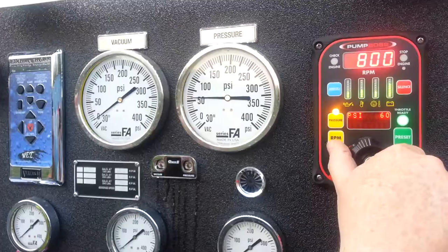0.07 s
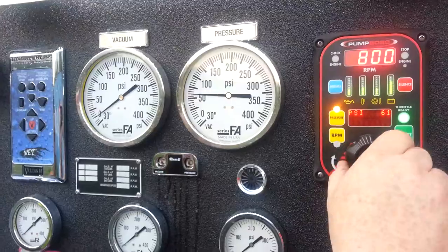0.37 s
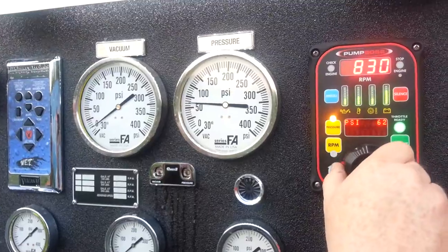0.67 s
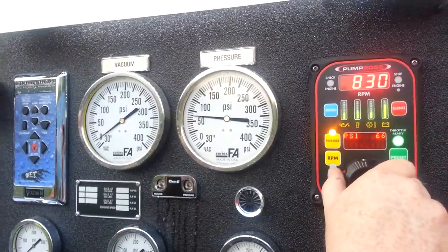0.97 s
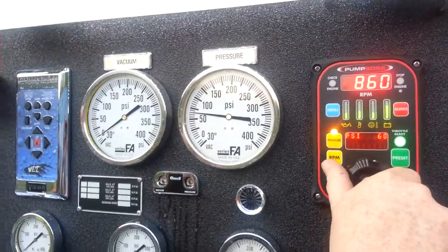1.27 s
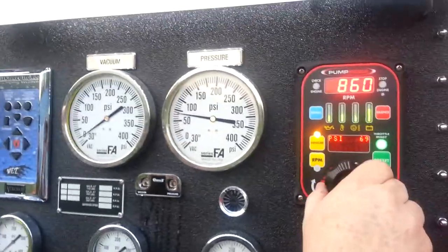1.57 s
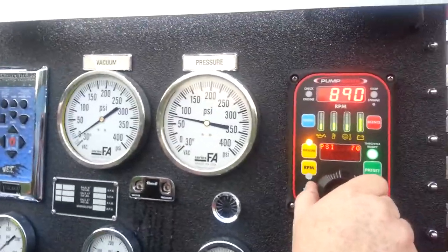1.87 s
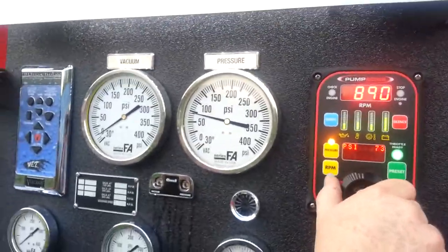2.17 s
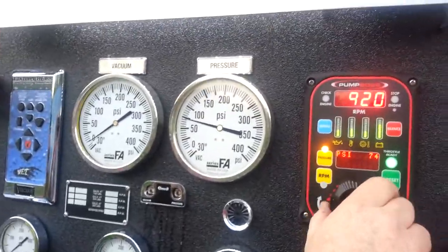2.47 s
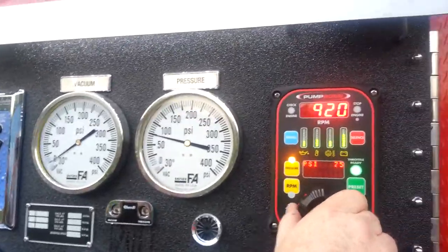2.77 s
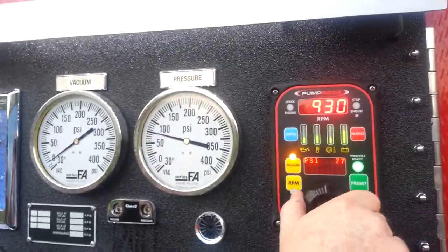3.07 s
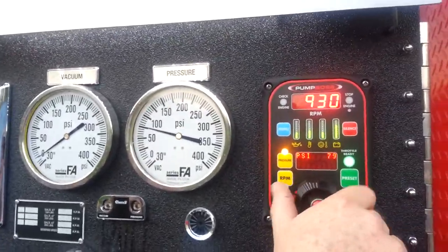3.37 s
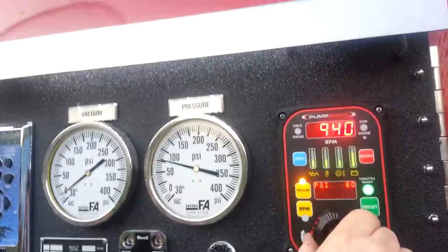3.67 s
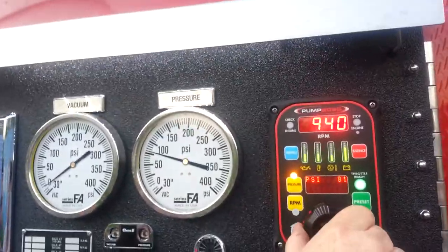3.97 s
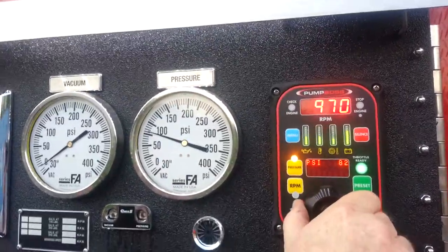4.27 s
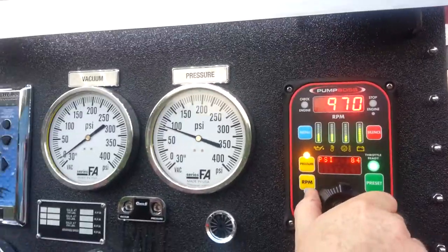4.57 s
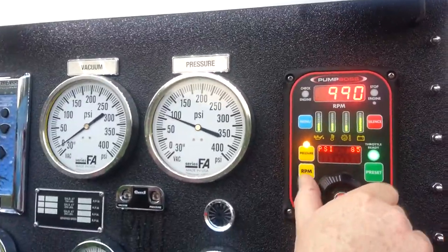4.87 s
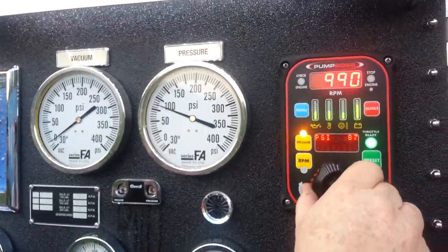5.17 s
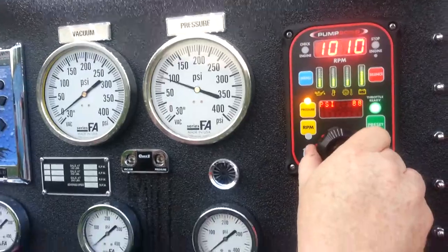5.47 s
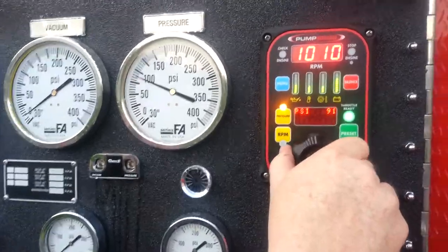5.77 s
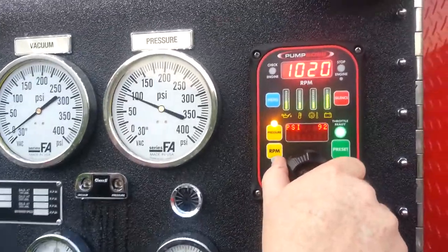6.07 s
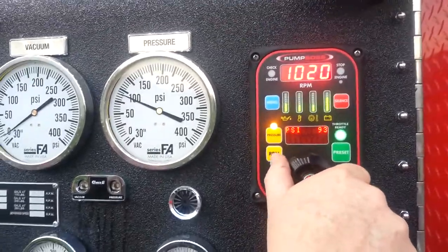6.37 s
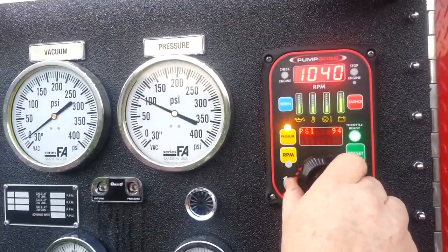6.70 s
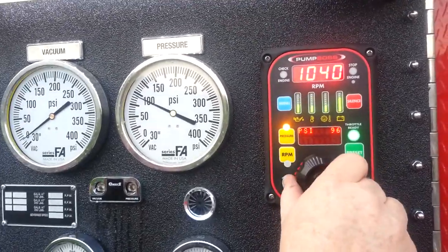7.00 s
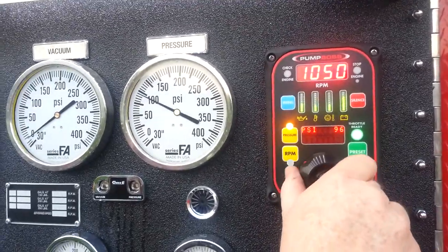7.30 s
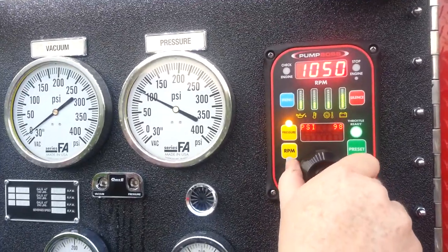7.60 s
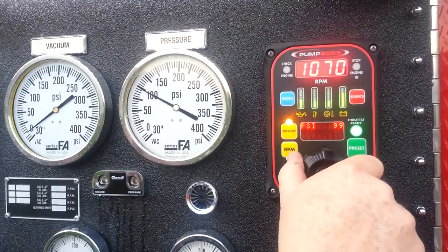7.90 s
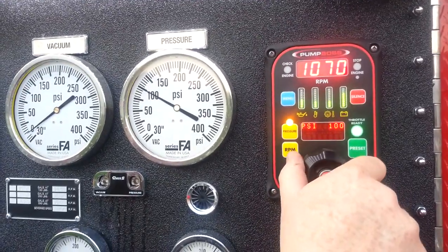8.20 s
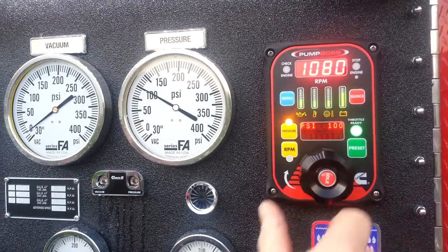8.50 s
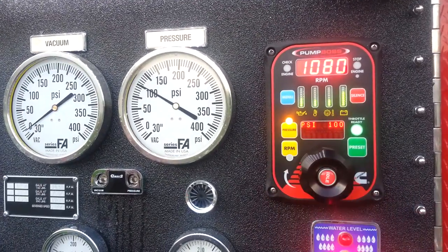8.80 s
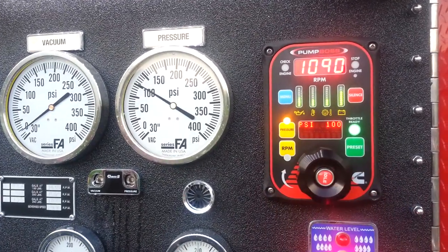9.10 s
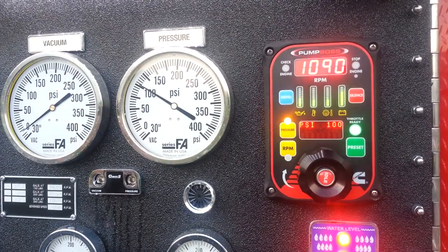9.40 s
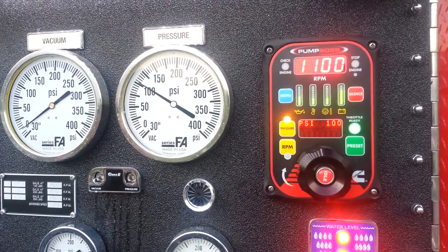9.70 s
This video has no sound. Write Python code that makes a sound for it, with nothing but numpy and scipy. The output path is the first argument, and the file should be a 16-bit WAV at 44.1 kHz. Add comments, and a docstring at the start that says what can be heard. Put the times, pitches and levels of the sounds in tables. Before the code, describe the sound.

A dense diesel roar starts abruptly, heard from right beside a fire truck's pump controls. As a hand turns the throttle knob with a few faint dry ticks, the engine gradually gains speed, carrying a fluttering gear whine and a low pump hum upward with it. Water begins rushing through a valve to the left. The loudness stays nearly even, while the low end grows fuller and a faint high whistle comes and goes.

```python
"""At a fire truck's pump panel: a hand winds the throttle and the six-cylinder diesel climbs from idle.
The engine roars, the pump's drive gears whine, its impeller hums, water rushes in the pipes to the left.
Tones swell and fade as they glide through fixed resonances of the gear casing and pump compartment.
The turbo whistles thinly, loose panels buzz briefly, and the throttle knob rubs and ticks faintly.
The microphone opens abruptly; a limiter catches the highest peaks."""
import sys
import numpy as np
from scipy import signal
from scipy.fft import rfft, irfft, next_fast_len
from scipy.io import wavfile
from scipy.ndimage import uniform_filter1d, minimum_filter1d, map_coordinates

SR = 44100
rng = np.random.default_rng(int(sys.argv[2]) if len(sys.argv) > 2 else 0)


def store_pcm(level_fs):
    """Save levels as 16-bit WAV."""
    pcm = np.round(np.clip(level_fs, -1, 1) * 32767).astype(np.int16)
    wavfile.write(sys.argv[1], SR, np.atleast_2d(pcm).T)


N = 434385
TIME_S = np.arange(N) / SR
VALVE_OPEN_S = 2.69


def engine(shaft_hz, firing_hz, repeat=0.36, throb=0.11, size=4096):
    """Diesel roar: clatter that repeats every two turns, plus fresh noise throbbing with each firing."""
    # f/Hz, relative density/dB
    spectrum = [(40, -44), (80, -21), (125, -11.5), (180, 0), (240, -3.5), (400, 0), (560, -1), (700, 3.5),
                (830, -0.5), (1050, 2.1), (1400, -4), (2000, -5), (3400, -15), (4800, -14.5), (5500, -20),
                (8000, -26.5), (10000, -33.5), (12000, -46), (14000, -90)]
    # f/Hz, left-right coherence
    coherence = [(130, 0.97), (270, 0.94), (450, 0.5), (700, 0.38), (1200, -0.075), (1800, -0.53),
                 (2500, 0.0071)]
    # t/s, level/dB
    levels = [(.85, -15.5), (2.2, -15), (2.9, -14), (3.6, -16), (5, -16), (6.3, -14.5), (7.5, -15.5),
              (9.85, -15)]
    cycle_index = cycles_of(shaft_hz) / 2 % 1 * size
    patterns = rng.standard_normal((2, size))
    clatter = np.array([map_coordinates(p, [cycle_index], mode="grid-wrap") for p in patterns])
    pulsing = 1 + throb * np.cos(2 * np.pi * cycles_of(firing_hz))
    gas = coloured(stereo_noise() * pulsing, spectrum)
    roar = np.sqrt(repeat) * coloured(clatter, spectrum) + np.sqrt(1 - repeat) * gas

    def mid_side_gains(hz):
        angle = np.arccos(np.clip(along(coherence, hz), -1, 1)) / 2
        return np.array([np.cos(angle), np.sin(angle)])

    mid, side = filtered(roar, mid_side_gains)
    return amp(curves(levels)[0]) * pan(0.5) * unit(np.array([mid + side, mid - side]))


def bite(x):
    """The roar's upper midrange sounds hard at first, then grows duller as heard."""
    # t/s, lift/dB
    lifts = [(.85, 3), (2.3, 4.5), (3.2, -1), (4.4, -1.5), (6.7, -3), (7.4, -5), (9.85, -5.5)]
    return x + (amp(curves(lifts)[0]) - 1) * band(x, centre_hz=1860, width_hz=800)


def body(x):
    """Sheet-metal panels lift whatever passes through their narrow resonances."""
    # f/Hz, width/Hz, lift/dB
    panels = [(502, 16, 3), (680, 27, 2), (2025, 63, 2.5), (3590, 70, 6.5)]
    mode = lambda hz, centre, width: 1j * hz * width / (centre ** 2 - hz ** 2 + 1j * hz * width)
    return filtered(x, lambda hz: 1 + sum((amp(db) - 1) * mode(hz, f, width) for f, width, db in panels))


def gears(shaft_hz, firing_hz, teeth=59):
    """Meshing teeth whine; firing pulses load them, adding two fluttering sidebands on either side."""
    # sidebands into the casing: t/s, lower/dB, upper/dB, outer pair/dB
    sideband_levels = [(0.8, -10, -11, -24), (2.3, -13, -5, -24), (3.4, -7.5, -9, -26), (4, -2.5, -10, -19),
                       (4.5, -4.5, -9, -16), (5.2, -7, -7, -16), (5.9, -1, -10.5, -17), (6.5, -7, -8, -19),
                       (7.2, -9, -7, -23), (9.85, -7.5, -4, -24)]
    lower_db, upper_db, outer_db = curves(sideband_levels)
    mesh_hz = teeth * shaft_hz
    shiver = 0.0052 * wobble(22)
    whine = amp(0.33 + 0.9 * wobble(25)) * casing(mesh_hz, shiver)
    sideband = lambda k, db: amp(db + 0.88 * wobble(9)) * casing(mesh_hz + k * firing_hz, shiver)
    inner = sideband(-1, lower_db) + pan(-3.5) * sideband(0.99, upper_db)
    outer = sideband(-2, outer_db) + sideband(2, outer_db)
    # backlash smears part of the octave into a narrow rasp
    rasp = casing(2 * mesh_hz, 0.42 * np.array([wobble(70), wobble(70)]))
    octave = amp(-2.4) * casing(2 * mesh_hz, 2 * shiver) + amp(-4.5) * rasp
    return whine + inner + outer + octave


def casing(hz, shiver_cycles):
    """A gear tone radiated by casing modes, in step on the left and each at its own phase on the right."""
    # f/Hz, width/Hz, level/dB, left-right/dB, left lead/rad
    modes = [(859, 27, -22, 2.6, 1.2), (883, 18, -18.5, 0, 0), (894, 21.5, -16.5, 2.5, 1.4),
             (919, 30, -19.5, 4.5, -1.5), (950, 35, -18, 8, -2), (974.2, 24, -19, 12.6, 1.5),
             (1003.2, 25, -16.5, 3.5, 2), (1023.6, 8.2, -25.3, 8, 0), (1044.6, 26, -16.5, 7, 0.5),
             (1055, 29.6, -15, 13.5, 4), (1071.6, 19.7, -15, -1, 0.5), (1083, 18, -17.5, -13, 1.16),
             (1090, 24.6, -14, 10, 1.36), (1115, 29, -20, -5, 1.3), (1138, 22, -15, 13.3, -2.5),
             (1810, 48, -26, 2, -0.5), (1860, 180, -22, 5, 2.5)]
    # dead spots between modes: f/Hz, width/Hz, dip/dB
    nulls = [(899.5, 4, -11), (962, 4.3, -4), (990, 5, -9), (1012, 4, -11), (1026, 2.5, -9)]
    centre_hz, width_hz, db, left_db, lead_rad = np.transpose(modes)
    mode_gains = amp(db) * pan(left_db) * np.array([np.ones_like(lead_rad), np.exp(-1j * lead_rad)])
    gain = mode_gains @ bell(hz, centre_hz[:, None], width_hz[:, None]) ** 2
    dip_db = sum(depth * bell(hz, f, width) for f, width, depth in nulls)
    phasor = np.exp(2j * np.pi * (cycles_of(hz) + shiver_cycles))
    return np.sqrt(2) * amp(dip_db) * np.imag(gain * phasor)


def impeller(shaft_hz, stumble_s=0.0081):
    """Each vane passing the outlet sends a pulse; turbulence makes the hum shiver, and it stumbles twice."""
    # t/s, dip/dB, slip/cycles
    stumbles = [(3.37, -12, 0.088), (5.425, -3, 0.52)]
    # multiple of the vane rate, base level/dB
    harmonics = [(3, -40), (4, -47), (5, -33), (6, -33.5), (7, -35.5), (8, -44.5)]
    vane_hz = 11.345 * shaft_hz
    vanes = cycles_of(vane_hz) + 0.014 * wobble(35)
    dip_db = sum(db * pulse(s, stumble_s) for s, db, _ in stumbles)
    slip = sum(ramp(s - stumble_s / 2, stumble_s, 0, cycles) for s, _, cycles in stumbles)
    hum = amp(-37.5 + compartment_db(vane_hz) + dip_db + 0.84 * wobble(30)) * tone(vanes + slip, 0.12)
    octave = amp(-37.5 + compartment_db(2 * vane_hz)) * pan(1.8) * tone(2 * vanes, 0.38)
    upper = sum(amp(db + compartment_db(k * vane_hz)) * fading_tone(k * vanes, 0.7, fade_db=2)
                for k, db in harmonics)
    return hum + octave + pan(17) * upper


def exhaust(firing_hz, extra_rpm, db_per_rpm=0.0639):
    """Firing harmonics growl louder with speed; the third and fourth drone in the pipe."""
    # multiple of the firing rate, base level/dB
    harmonics = [(1, -59), (2, -45.5), (5, -49), (8, -49), (12, -48), (13, -39.5), (14, -40)]
    # t/s, third harmonic/dB, fourth harmonic/dB
    drone_levels = [(0.8, -44, -42), (1.2, -44, -40), (1.9, -45, -33), (3.3, -43, -33), (3.65, -42, -34),
                    (4, -45, -45), (4.9, -43, -44), (6, -43, -40), (7, -31.5, -35), (8.1, -30.5, -39),
                    (9, -34.5, -41), (9.85, -39, -48)]
    firings = cycles_of(firing_hz)
    growl = sum(amp(db + compartment_db(k * firing_hz)) * fading_tone(k * firings, 0.056 * k, fade_db=1.5)
                for k, db in harmonics)
    # the fourth beats with the impeller's hum: a chug near 10 Hz
    drone = sum(amp(db + 0.8 * wobble(9)) * tone(k * firings, 0.15)
                for k, db in zip((3, 4), curves(drone_levels)))
    return amp(db_per_rpm * extra_rpm) * growl + drone


def compartment_db(hz):
    """Lift of a tone gliding through the pump compartment's standing waves."""
    # f/Hz, width/Hz, lift/dB
    standing_waves = [(92, 4.7, 7), (102.6, 1.4, 3.5), (164.6, 3.5, 7), (170, 1.8, -8), (175.4, 8.5, 11.5),
                      (189.8, 15.3, 16), (205.2, 11.2, 15), (208.9, 0.94, -3), (332.5, 12.4, 16.5),
                      (385, 20, 7.5), (418.3, 9.1, 12), (507, 41, 12.5), (670.4, 17, 11.5), (722, 11, 0)]
    return sum(db * bell(hz, f, width) for f, width, db in standing_waves)


def water(extra_rpm, right_lag_s=0.0002):
    """Turbulent rush in the valves on the left, fine hiss above, faint rumble below; all grow with speed."""
    # each: f/Hz, relative density/dB
    rush_spectrum = [(400, -70), (1000, -7), (1400, -5), (1800, -1.8), (2050, 0.8), (2350, 0.9),
                     (2900, 0.6), (3200, -2.5), (3500, -5), (4000, -8.5), (4700, -12), (5200, -38),
                     (7000, -60), (10000, -110)]
    spray_spectrum = [(1500, -60), (4000, -3), (6300, 2.5), (8000, 6.5), (10300, 6), (11100, -2),
                      (11800, -12.5), (12600, -17), (15000, -58)]
    rumble_spectrum = [(20, -8), (55, 7), (120, -1), (250, -29), (1000, -100)]
    # the rush steps up as the valve opens; the hiss sets in as pressure builds
    rush_db = ramp(VALVE_OPEN_S, rise_s=0.3, before=-18, after=-13) + 0.0082 * extra_rpm
    spray_db = ramp(1.73, rise_s=0.37, before=-64, after=-37) + 0.0331 * extra_rpm
    rumble_db = -70 + 0.0811 * extra_rpm
    left, right = valve_throat(coloured(stereo_noise(), rush_spectrum), extra_rpm)
    delayed_left = filtered(left, lambda hz: np.exp(-2j * np.pi * hz * right_lag_s))
    rush = np.array([left, 0.52 * right + 0.29 * delayed_left]) * amp(0.55 * wobble(40) + 0.44 * wobble(8))
    spray = coloured(stereo_noise(), spray_spectrum) * amp(1.2 * wobble(110))
    rumble = coloured(stereo_noise(), rumble_spectrum) * amp(1.2 * wobble(5.5))
    flow = amp(rush_db) * pan(23.6) * rush + amp(spray_db) * pan(9.6) * spray
    return enclosure(flow) + amp(rumble_db) * pan(1) * rumble


def valve_throat(x, extra_rpm):
    """Faster flow shifts the rush from the valve's lower resonances to the upper one."""
    # f/Hz, width/Hz, slope/(dB/rpm)
    resonances = [(1950, 1500, 0), (2720, 1800, -0.0059), (3200, 170, 0.0246)]
    return x + sum((amp(slope * extra_rpm) - 1) * band(x, f, width) for f, width, slope in resonances)


def enclosure(x, t60_s=0.096, wet=0.14, size=4096):
    """Short reflections behind the pump panel colour the water noise metallic."""
    tail = rng.standard_normal((2, size)) * amp(-60 * TIME_S[:size] / t60_s)
    tail /= np.linalg.norm(tail, axis=1, keepdims=True)
    echo = signal.fftconvolve(x, tail, axes=1)[:, :N]
    return (x + wet * echo) / np.sqrt(1 + wet ** 2)


def valve(delay_s=0.19, swell_s=0.12):
    """Just after opening, the valve sings briefly in a narrow hiss."""
    age = np.maximum(TIME_S - VALVE_OPEN_S - delay_s, 0) / swell_s
    return amp(-26) * age * np.exp(1 - age) * pan(15) * narrow_noise(centre_hz=4450, width_hz=400)


def rattles():
    """Loose sheet metal shakes near idle in short swells of narrow noise."""
    # t/s, f/Hz, level/dB
    buzzes = [(.92, 2020, -23), (.98, 2970, -27), (1.28, 2020, -20)]
    return pan(6.9) * sum(amp(db) * pulse(s, 0.05) * narrow_noise(hz, width_hz=240) for s, hz, db in buzzes)


def knob(tick_t60_s=0.083, rise_s=0.004, slips_per_s=110, slip_t60_s=0.013):
    """Fingers catch and slip on the plastic throttle knob in a fine crackle; it gives small dry ticks."""
    # each: t/s, level/dB
    ticks = [(1.087, -30), (1.578, -32), (2.14, -29), (2.22, -31), (2.288, -26), (2.76, -30), (3.862, -27),
             (8.945, -30)]
    rub_levels = [(2, -92), (2.15, -47), (2.3, -50), (2.45, -52), (2.77, -48), (2.9, -84)]
    # f/Hz, relative density/dB
    spectrum = [(2000, -30), (5000, 0), (10000, -6), (13000, -3), (15000, -22)]
    strikes = sum(amp(db - 60 * np.abs(TIME_S - s) / tick_t60_s) * ramp(s, rise_s, 0, 1) for s, db in ticks)
    slips = (rng.random(N) < slips_per_s / SR) * amp(3 * rng.standard_normal(N))
    crackle = unit(signal.fftconvolve(slips, amp(-60 * TIME_S[:512] / slip_t60_s))[:N])
    envelope = 0.65 * strikes + amp(curves(rub_levels)[0]) * crackle
    return pan(5.4) * envelope * coloured(stereo_noise(), spectrum)


def turbo(extra_rpm, hz_per_rpm=16.4):
    """The turbocharger's thin whistle climbs with engine speed."""
    # t/s, level/dB
    levels = [(4.4, -70), (5.6, -48), (6.2, -56), (8.2, -64), (9.2, -47), (9.85, -50)]
    hz = (7800 + hz_per_rpm * extra_rpm) * (1 + 0.0036 * wobble(90))
    return amp(curves(levels)[0] + 3.5 * wobble(20)) * tone(cycles_of(hz), 2 * wobble(9.7))


def tone(cycles, lead_rad):
    """Stereo sine of rms 1, left leading."""
    phase = 2 * np.pi * cycles
    return np.sqrt(2) * np.array([np.sin(phase + lead_rad / 2), np.sin(phase - lead_rad / 2)])


def fading_tone(cycles, spread_rad, fade_db):
    """A tone wandering at random in level and direction, as if gliding through panel resonances."""
    return amp(fade_db * wobble(4)) * tone(cycles + rng.random(), spread_rad * wobble(2.07))


def cycles_of(hz):
    """Cycles completed at a changing rate."""
    return np.cumsum(hz) / SR


def stereo_noise():
    """Two independent white channels."""
    return rng.standard_normal((2, N))


def narrow_noise(centre_hz, width_hz):
    """Stereo noise band of rms 1."""
    return unit(filtered(stereo_noise(), lambda hz: bell(hz, centre_hz, width_hz) ** 2))


def coloured(x, spectrum):
    """x shaped by (f/Hz, level/dB) points, at rms 1."""
    return unit(filtered(x, lambda hz: amp(along(spectrum, hz))))


def band(x, centre_hz, width_hz):
    """x through one resonance."""
    return filtered(x, lambda hz: bell(hz, centre_hz, width_hz))


def filtered(x, response):
    """x through a frequency response."""
    size = next_fast_len(N + SR // 2)
    return irfft(rfft(x, size) * response(np.fft.rfftfreq(size, 1 / SR)), size)[..., :N]


def bell(hz, centre_hz, width_hz):
    """Resonance peak of height 1."""
    return 1 / (1 + (2 * (hz - centre_hz) / width_hz) ** 2)


def along(points, hz):
    """(f/Hz, value) points interpolated on a log axis."""
    f, values = np.transpose(points)
    return np.interp(np.log(hz + 1), np.log(f + 1), values)


def curves(rows):
    """One value per sample for each column after t/s."""
    times_s, *columns = np.transpose(rows)
    return [np.interp(TIME_S, times_s, column) for column in columns]


def wobble(knots_per_s):
    """Smooth random curve."""
    knots = rng.standard_normal(int(N * knots_per_s / SR) + 4)
    return map_coordinates(knots, [TIME_S * knots_per_s])


def ramp(start_s, rise_s, before, after):
    """One linear move to a new value."""
    return before + (after - before) * np.clip((TIME_S - start_s) / rise_s, 0, 1)


def pulse(centre_s, width_s):
    """Gaussian of height 1."""
    return np.exp(-((TIME_S - centre_s) / width_s) ** 2)


def pan(left_db):
    """Left and right gains of mean power 1."""
    ratio = amp(np.atleast_1d(left_db))
    return np.array([ratio, np.ones_like(ratio)]) * np.sqrt(2 / (1 + ratio ** 2))


def amp(db):
    """Decibels to gain."""
    return 10 ** (np.asarray(db) / 20)


def unit(x):
    """x at rms 1."""
    return x / np.sqrt(np.mean(x ** 2) + 1e-20)


def scene():
    """One crankshaft drives the exhaust, the gears and the pump."""
    # t/s, crankshaft speed/rpm
    speeds = [(0.8, 856.3), (1.25, 878.5), (1.6, 898), (2.25, 922.2), (3, 942.3), (3.22, 941.8),
              (3.45, 949.4), (3.8, 967.8), (4.35, 982.3), (4.7, 999.8), (5.05, 1009.5), (5.52, 1016.7),
              (5.72, 1025.4), (6.2, 1034.2), (6.45, 1043.3), (7.66, 1070.3), (7.8, 1078.4), (8.5, 1094.4),
              (9.1, 1104.5), (9.65, 1103.5), (9.85, 1107)]
    rpm, = curves(speeds)
    shaft_hz = rpm / 60
    firing_hz = 3 * shaft_hz  # six cylinders, four-stroke
    extra_rpm = rpm - 1000
    roar = bite(engine(shaft_hz, firing_hz))
    diesel = body(roar + exhaust(firing_hz, extra_rpm)) + turbo(extra_rpm) + rattles()
    pump = gears(shaft_hz, firing_hz) + impeller(shaft_hz)
    return diesel + pump + water(extra_rpm) + valve() + knob()


def record(dry):
    """The microphone opens abruptly; a fast limiter holds peaks at full scale; the top treble is cut."""
    open_s, cutoff_hz = 0.8145, 14800
    x = dry * (TIME_S >= open_s)
    needed_gain = 1 / np.maximum(np.abs(x), 1)
    gain = uniform_filter1d(minimum_filter1d(needed_gain, size=17), size=17)
    return signal.sosfilt(signal.butter(14, cutoff_hz, fs=SR, output="sos"), x * gain)


dry = scene()
out = record(dry)
store_pcm(out)
```